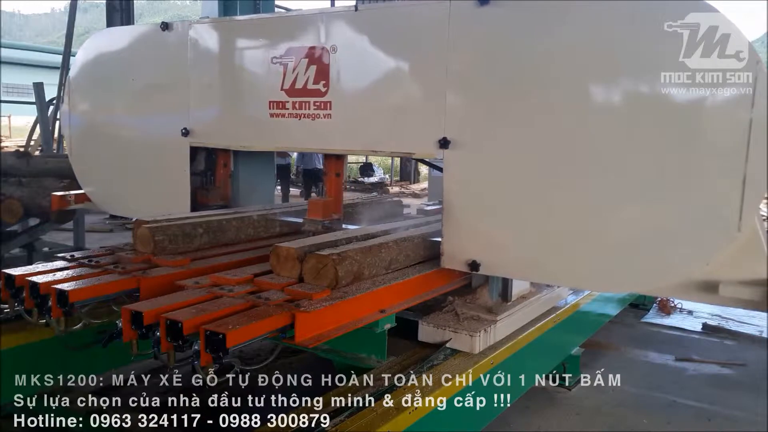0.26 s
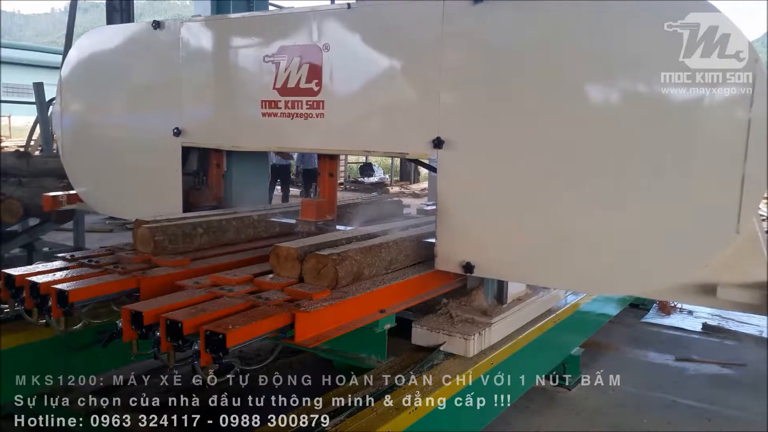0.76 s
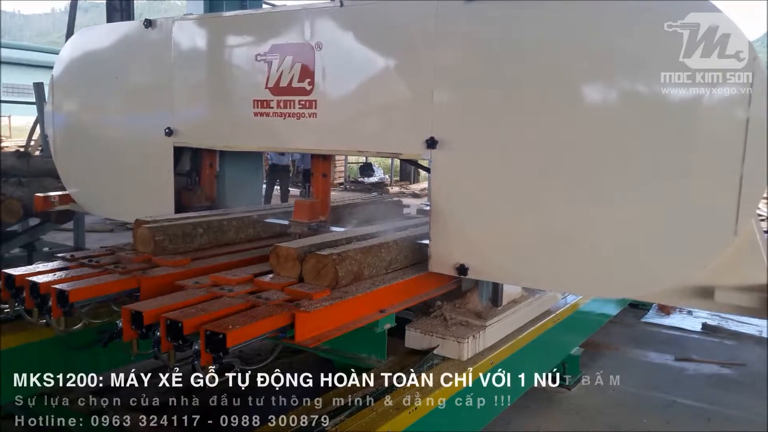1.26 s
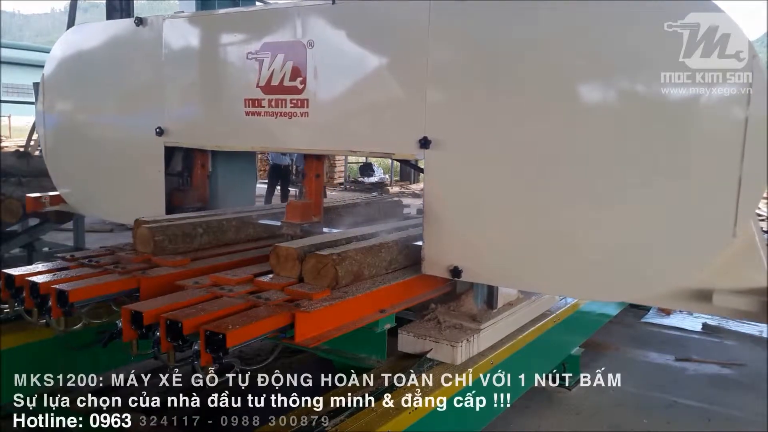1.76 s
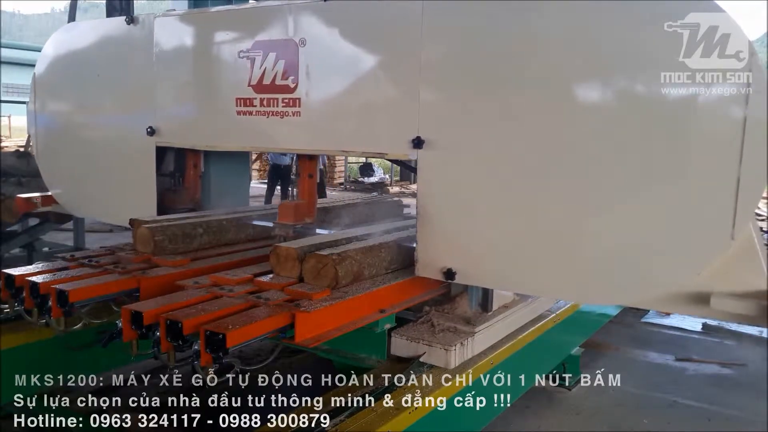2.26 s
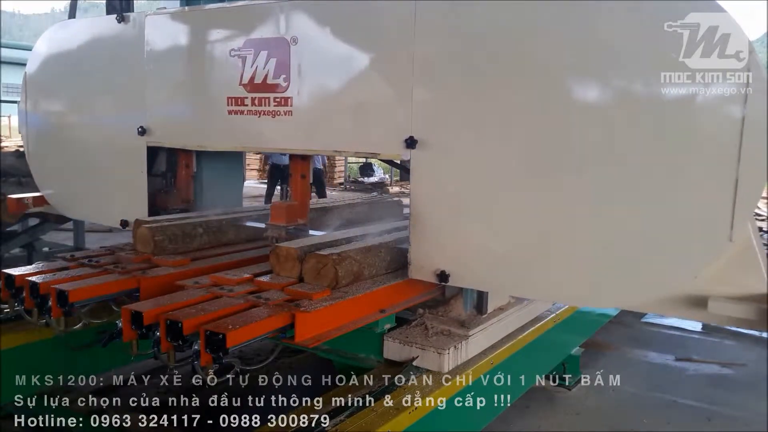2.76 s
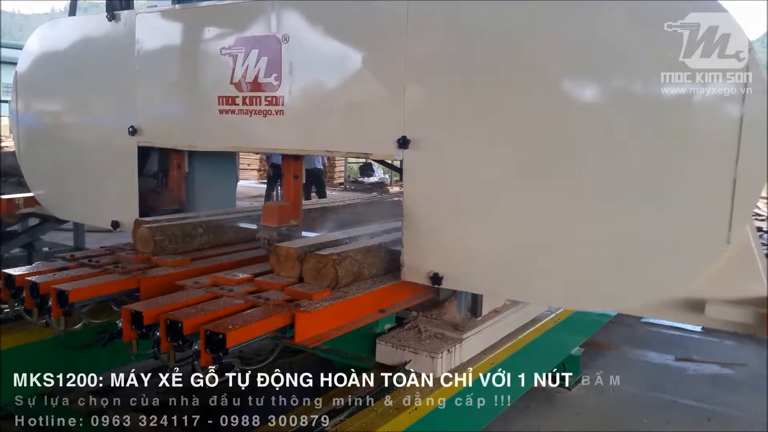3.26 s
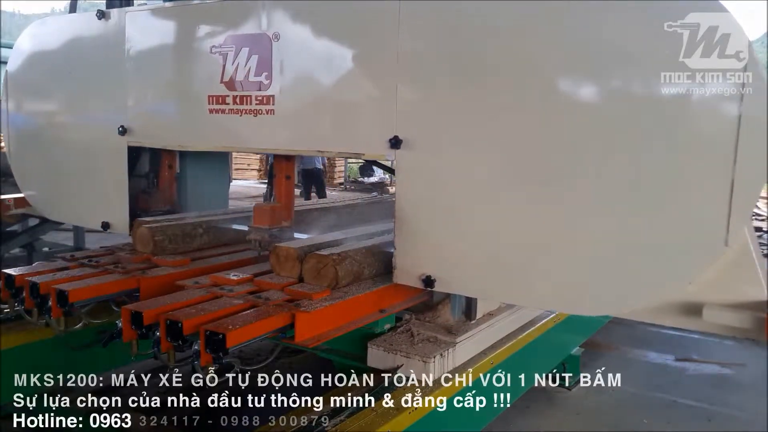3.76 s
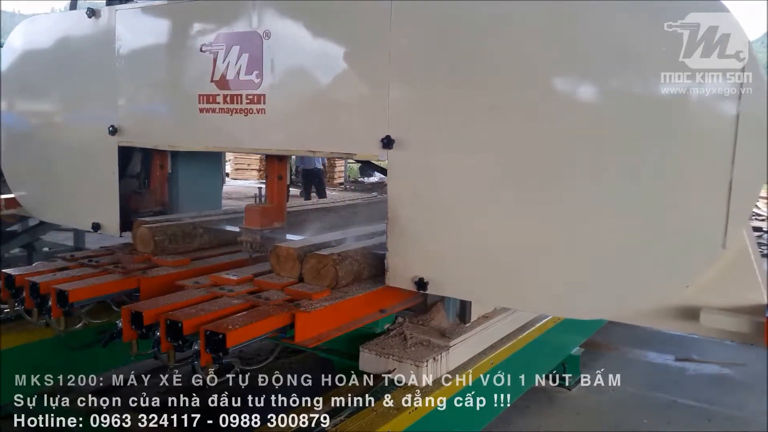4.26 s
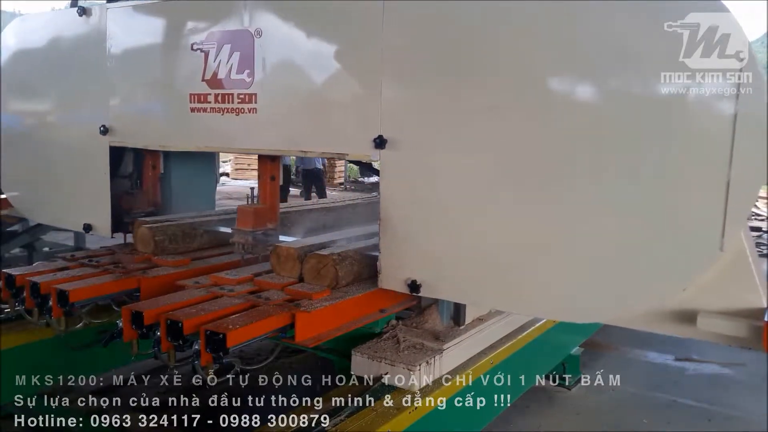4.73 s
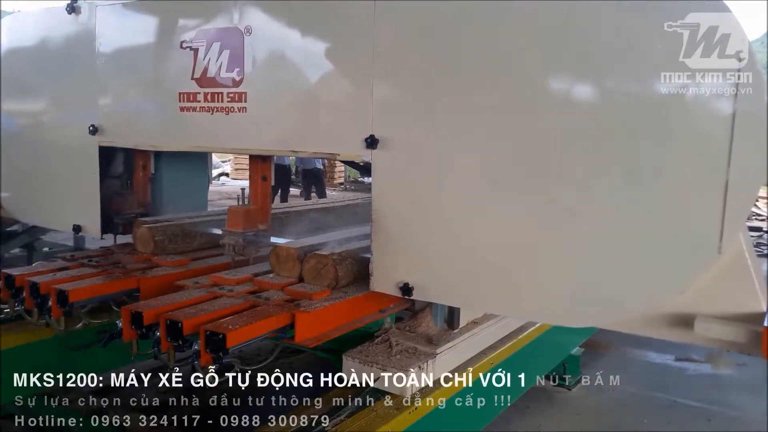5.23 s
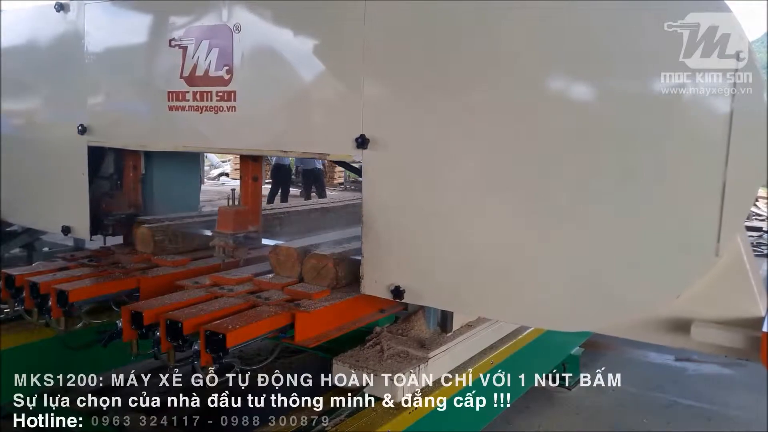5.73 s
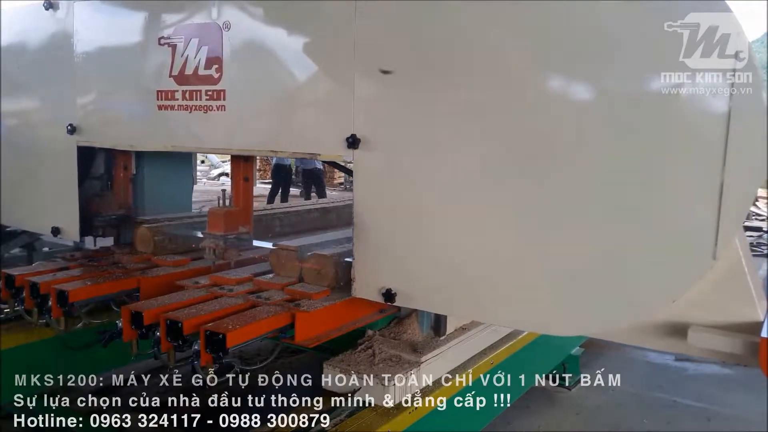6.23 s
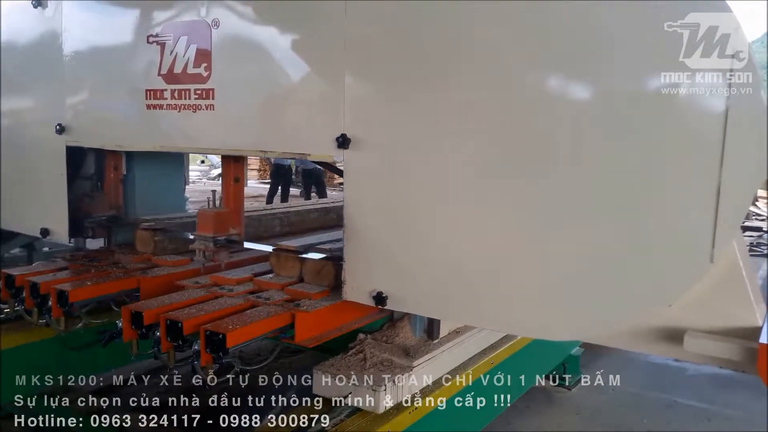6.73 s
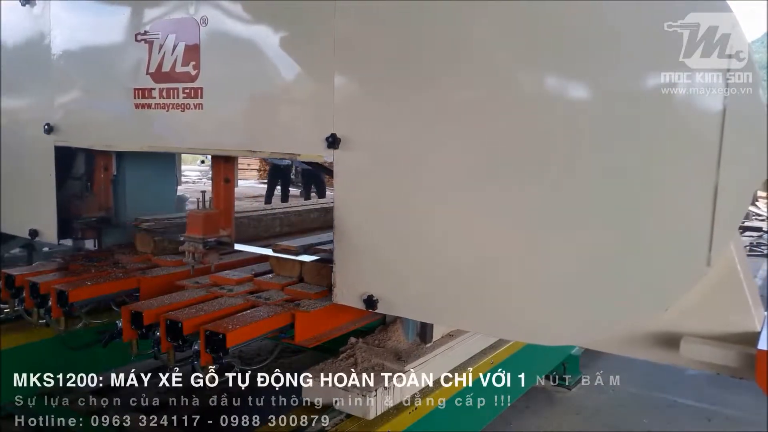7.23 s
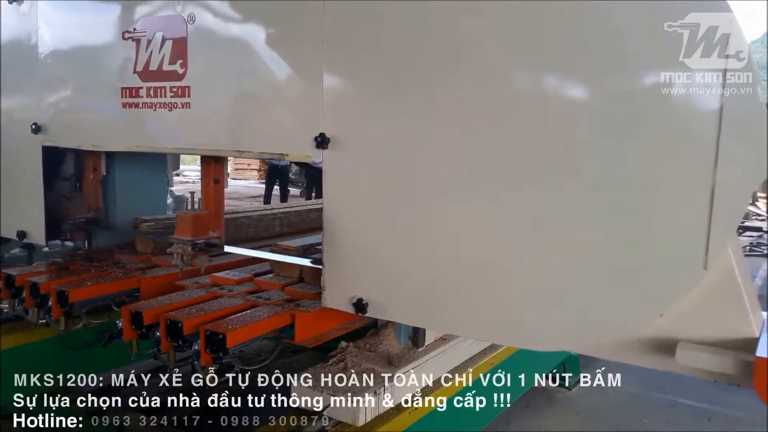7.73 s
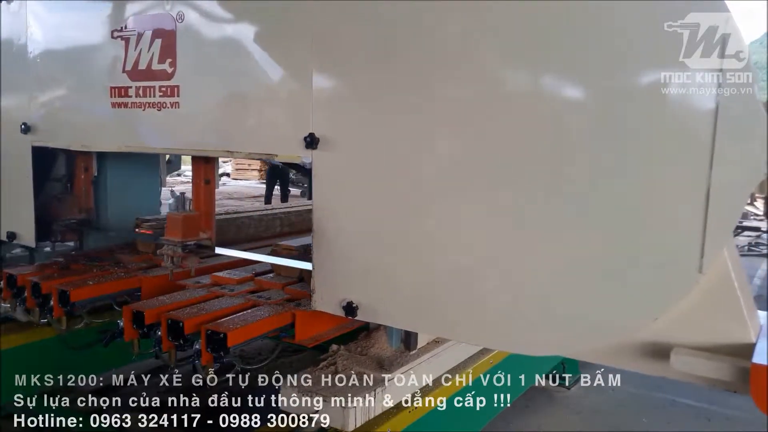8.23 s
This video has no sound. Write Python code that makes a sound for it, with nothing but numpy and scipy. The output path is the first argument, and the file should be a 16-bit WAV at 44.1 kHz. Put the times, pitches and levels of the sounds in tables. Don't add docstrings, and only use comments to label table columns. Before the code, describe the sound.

Continuous wood sawing, heard by two close small microphones: wide, diffuse hiss with little deep bass, a wavering metallic whine from the teeth and a constant machine roar. After most of the stretch the blade leaves the logs; the rasp fades, leaving roar and ringing steel, fuzzy fluttering whistles and a few dull metal rattles.

```python
import sys
import numpy as np
from scipy import signal
from scipy.fft import rfft, irfft
from scipy.io import wavfile
from scipy.ndimage import uniform_filter1d

SR = 44100
rng = np.random.default_rng(int(sys.argv[2]) if len(sys.argv) > 2 else 0)


def dump(signal):
    limited = np.clip(np.atleast_2d(signal).T, -1, 1)
    pcm = np.round(limited * 32767).astype(np.int16)
    wavfile.write(sys.argv[1], SR, pcm)


def convert_level_to_amplitude(level_db):
    exponent = np.asarray(level_db, float) / 20
    return 10 ** exponent


N = 374409
T = np.arange(N) / SR

# frequency in Hz, density in dB per Hz.
THRUM_SPECTRUM = [(20, -92), (50, -97), (80, -97), (110, -80), (140, -82), (200, -77.5), (250, -86),
                  (330, -100)]
# frequency in Hz, density in dB per Hz.
RUMBLE_SPECTRUM = [(180, -100), (260, -83.5), (330, -72), (400, -77.5), (500, -74.5), (600, -71.5),
                   (750, -70.5), (1000, -110)]
# frequency in Hz, density in dB per Hz.
ROAR_SPECTRUM = [(1200, -96.5), (1700, -77), (2100, -67), (2500, -68), (2900, -66.5), (3300, -68),
                 (3800, -71.5), (4500, -74.5), (5500, -77), (6500, -82), (8000, -87), (9500, -80),
                 (11000, -87.5), (15700, -89)]
# frequency in Hz, density in dB per Hz.
RING_SPECTRUM = [(450, -100), (600, -81.5), (700, -73.5), (780, -72), (850, -64.5), (1000, -64.5),
                 (1150, -66.5), (1350, -64), (1700, -67.5), (2100, -73.5), (2600, -90)]
# frequency in Hz, level in dB, loudest time in seconds, fall in dB a second.
MOTOR_TONES = [(333, -53, 6.12, 26), (335.6, -62, 7.9, 3), (419, -58, 1.1, 4), (455.3, -53, 8, 1.24),
               (599, -65, 6.5, 1), (645, -54.5, 1, 2), (649, -60, 4, 3), (746, -51, 3, 4.5),
               (915, -51.5, 7.3, 0.5), (986, -51.5, 4.4, 2), (1188, -55.5, 1.7, 2), (1357, -46, 6.46, 4),
               (1438, -49.5, 6, 4), (1492, -54, 2.3, 0.5)]
# frequency in Hz, width in Hz, level in dB,
# loudest time in seconds, fall in dB a second.
HOUSING_MODES = [(847, 9.8, -46, 8, 7), (862, 12, -49, 8.5, 4), (802, 14, -44, 8, 18),
                 (942, 10, -56.5, 7, 0.5), (1027, 4.5, -54.5, 3.5, 5.5), (1853, 31, -45.5, 7, 1.5),
                 (2018, 33, -55, 1, 2.5), (2362, 17, -50.5, 3.5, 2.5), (2500, 95, -42, 0.5, 3.5),
                 (2637, 46, -45.5, 7, 10), (2880, 99, -44.5, 4.5, 3.7), (4176, 30, -48.5, 2, 3.4),
                 (9180, 50, -49.5, 8.5, 1.5), (9970, 60, -48.5, 4.5, 4.5)]
# frequency in Hz, width in Hz, level in dB.
CLAMP_MODES = [(1360, 38, 0), (1850, 33, 0), (2140, 41, -4), (2670, 40, 1), (2800, 200, -1),
               (3780, 49, -12), (4670, 70, -9), (5080, 110, -9), (5000, 1400, -9), (5700, 70, -10)]
# start in seconds, level in dB, rattle length in seconds, extra dB of the shrill modes.
CLANKS = [
    (7.866, -35, .05, -6),
    (7.923, -28, 0.045, -9),
    (8.008, -28, .04, 3),
    (8.095, -38.5, 0.064, 10),
    (8.217, -44, .06, 0),
]
# centre in seconds, frequency in Hz, level in dB, spread in seconds.
WHISTLES = [
    (6.87, 866, -45, .04),
    (7.1, 856, -41.5, 0.035),
    (7.315, 862, -39, 0.042),
    (7.47, 866, -38.5, .03),
    (7.585, 850, -43, .025),
    (7.775, 860, -37.5, .04),
    (7.99, 858, -40.5, .035),
    (8.3, 843, -38.5, 0.065),
    (8.47, 850, -39.5, 0.036),
]
# frequency in Hz, density in dB per Hz.
RASP_SPECTRUM = [(1000, -98), (1700, -72.5), (1800, -78), (2100, -68), (2500, -66), (2900, -65),
                 (3050, -73), (3300, -66.5), (3800, -71), (4500, -74.5), (5500, -76), (6500, -82.5),
                 (8000, -83.5)]
# frequency in Hz, density in dB per Hz.
DUST_SPECTRUM = [(5000, -93.5), (6500, -78), (8000, -79.5), (9000, -74.5), (10000, -77), (11000, -77.5),
                 (13000, -78.5), (14200, -75.5), (15700, -80.5)]
# multiple of the tooth rate, level in dB.
WEAK_HARMONICS = [(4, -51), (6, -59), (7, -58), (8, -60), (9, -59), (10, -61), (11, -60), (12, -62),
                  (13, -63), (14, -63), (15, -66), (16, -65), (17, -64)]
# multiple of the tooth rate,
# centre in seconds, level in dB, spread in seconds.
SINGING_HARMONICS = [(1, 0.97, -52.5, 0.14), (1, 1.5, -50, .5), (1, 3.05, -42.5, 0.45), (1, 4.46, -53, .4),
                     (1, 5.93, -46.5, 0.59), (2, .5, -46.5, .3), (2, 2.12, -49, 0.45), (2, 3.6, -49, 0.13),
                     (2, 4.33, -49, 0.26), (2, 5.2, -51, 0.18), (2, 6.14, -47, 0.43), (3, .6, -52, 0.44),
                     (3, 2, -44.5, 0.39), (3, 3.4, -47.5, 0.4), (3, 4.57, -42, .35), (3, 5.27, -45.5, 0.15),
                     (3, 6.75, -51, .4), (5, .3, -51, .2), (5, 1.1, -47, 0.27), (5, 1.69, -44.5, 0.15),
                     (5, 2.2, -53, .1), (5, 2.75, -53, 0.17), (5, 4.74, -46, 0.12), (5, 4.34, -53, 0.17),
                     (5, 5.2, -50, .15)]
# frequency in Hz, left-right likeness from 0 to 1.
LIKENESS = [(60, .6), (300, 0.75), (700, .68), (1400, 0.47), (2500, 0.37), (5000, 0.23), (9600, 0.17),
            (11000, 0.41), (12400, 0.65), (14200, .38), (15800, .68)]
# time in seconds, lead in samples.
LEFT_LEAD = [(0, 3.6), (5.5, 5.5), (8.49, 5.7)]
# centre in seconds, depth in dB, spread in seconds.
BASS_DIPS = [
    (.412, 22, 0.008),
    (1.105, 30, 0.009),
    (1.572, 28, 0.007),
    (1.615, 28, 0.0062),
    (3.82, 7, 0.017),
    (4.583, 5, .012),
    (4.82, 9, 0.012),
    (5.775, 9, 0.01),
]

FREED_S = 6.61


def evened(x):
    return x / np.sqrt(np.mean(x ** 2) + 1e-20)


def read(points, hz):
    f, value = np.transpose(points)
    return np.interp(np.log(hz + 1), np.log(f + 1), value)


def ramp(s, length):
    return np.clip((T - s) / length, 0, 1)


def bump(s, spread):
    return np.exp(-.5 * ((T - s) / spread) ** 2)


def passing(db, s, fall_db):
    return db - fall_db * abs(T - s)


def in_wood():
    return -60 * np.clip(T - 6.75, 0, 1)


def drift(t, top_hz, low_hz=0.1995):
    rates = np.geomspace(low_hz, top_hz, num=16)
    return evened(sum(np.sin(2 * np.pi * (f * t + rng.random())) / np.sqrt(f) for f in rates))


def resonate(x, hz, width):
    turn = np.exp(2j * np.pi * hz * np.arange(len(x)) / SR)
    r = np.exp(-np.pi * width / SR)
    return 2 * (turn * signal.lfilter([1 - r], [1, -r], x / turn)).real


def hiss(spectrum, level_db, patchy_db, flicker_db, size=1024, patch=(.12, 500), comb_db=None):
    hop = size // 4
    hz = np.fft.rfftfreq(size, 1 / SR)[:, None]
    t = np.arange(N // hop + 5) * hop / SR
    a, b, c, d, patches = rng.standard_normal((len(t), len(hz), 5)).T
    for axis, span in enumerate((patch[1] * size / SR, patch[0] * SR / hop)):
        span = max(round(span), 1)
        patches = uniform_filter1d(uniform_filter1d(patches, span, axis), span, axis)
    same = np.clip(read(LIKENESS, hz), 0, 1)
    right = a + 1j * b
    lead_s = np.interp(t, *np.transpose(LEFT_LEAD)) / SR
    early = np.exp(2j * np.pi * hz * lead_s * (hz < 10200))
    left = same * early * right + np.sqrt(1 - same ** 2) * (c + 1j * d)
    shape_db = read(spectrum, hz)
    moving_db = patchy_db * evened(patches) + flicker_db * drift(t, 25)
    if comb_db:
        moving_db = moving_db + comb_db(hz)
    z = np.array([left, right]) * convert_level_to_amplitude(shape_db + moving_db)
    rms = np.sqrt(np.sum(convert_level_to_amplitude(2 * shape_db)) * SR / size)
    noise = signal.istft(z, nperseg=size, noverlap=size - hop)[1][:, :N]
    return convert_level_to_amplitude(level_db) * rms * evened(noise)


def tone(turns, db, waver_db, blur):
    t = T[::256]
    level, phase = drift(t, 40, 4), drift(t, 25, 1.5)
    sides = []
    for _ in "LR":
        side_db = waver_db * (level + .5 * drift(t, 20, 2))
        side_phase = blur * phase + .45 * drift(t, 6, .6)
        wave = np.sin(2 * np.pi * turns + np.interp(T, t, side_phase))
        sides.append(np.sqrt(2) * convert_level_to_amplitude(db + np.interp(T, t, side_db)) * wave)
    return np.array(sides)


def span_modes(hz):
    span_hz, stiffness = 39.2, 3.8e-5
    k = np.arange(80)
    mode = np.interp(hz, k * span_hz * np.sqrt(1 + stiffness * k ** 2), k)
    return 4.2 * np.cos(2 * np.pi * mode)


def machine():
    drive_s, rise_s, fall_s = 7.8, 0.21, 0.4
    drive_db = 3.5 * ramp(drive_s, rise_s) * np.exp(-np.maximum(T - drive_s - rise_s, 0) / fall_s)
    thrum_db = -3 + 3.5 * ramp(FREED_S, .4) + 1.8 * drift(T, 12, 2.5)
    rumble_db = -3 + .5 * drift(T, 3) + ramp(5.7, 0.52)
    roar_db = .5 * drift(T, 3) + drive_db
    ring_db = -1.5 + .4 * drift(T, 3) + .5 * drive_db + 2.5 * bump(FREED_S, .3)
    thrum = hiss(THRUM_SPECTRUM, thrum_db, patchy_db=2.0, flicker_db=1.9, size=4096, patch=(.1, 40))
    rumble = hiss(RUMBLE_SPECTRUM, rumble_db, patchy_db=1.85, flicker_db=0.75, size=2048, patch=(.2, 45))
    roar = hiss(ROAR_SPECTRUM, roar_db, patchy_db=2.0, flicker_db=0.72, size=2048, patch=(.3, 50))
    ring = hiss(RING_SPECTRUM, ring_db, patchy_db=3.0, flicker_db=0.4, size=4096, patch=(.45, 22),
                comb_db=span_modes)
    return thrum + rumble + roar + ring


def hum():
    return sum(tone(hz * T, passing(*place), waver_db=2.5, blur=.25 + hz / 2000)
               for hz, *place in MOTOR_TONES)


def housing():
    out = np.zeros((2, N))
    for hz, width, *place in HOUSING_MODES:
        noises = rng.standard_normal((2, N))
        a, b = (evened(resonate(resonate(v, hz, width), hz, width)) for v in noises)
        level_db = passing(*place) + in_wood() * (hz > 4000)
        out += convert_level_to_amplitude(level_db) * np.array([a, .6 * a + .8 * b])
    return out


def clamp():
    a, b = rng.standard_normal((2, N))
    out = np.zeros((2, N))
    for hz, width, mode_db in CLAMP_MODES:
        swell = 0
        for s, db, length, shrill_db in CLANKS:
            decay = np.exp(-np.maximum(T - s, 0) / length)
            swell = swell + convert_level_to_amplitude(db + shrill_db * (hz > 4000)) * ramp(s, .012) * decay
        sides = np.array([evened(resonate(v, hz, width)) for v in (a, .4 * a + .9 * b)])
        out += convert_level_to_amplitude(mode_db - 7.5) * swell * sides
    return out


def whistles():
    return sum(tone(hz * T, db, waver_db=1.5, blur=0.69) * bump(s, spread)
               for s, hz, db, spread in WHISTLES)


def chips():
    loop_hz = 3.9
    settle_db = -3.5 * np.exp(-T / 0.37)
    throb_db = 0.42 * np.sin(2 * np.pi * loop_hz * T + drift(T, 1.54))
    bite_db = settle_db + throb_db + .6 * drift(T, 16, 4)
    taper_db = -24 * np.maximum(T - 6.9, 0)
    dust_stop_db = -17 * ramp(6.635, 0.046)
    rasp = hiss(RASP_SPECTRUM, -0.5 + bite_db + taper_db, patchy_db=2.1, flicker_db=0.4, size=2048,
                patch=(.5, 30))
    fizz = hiss(DUST_SPECTRUM, .5 + bite_db + .1 * taper_db + dust_stop_db, patchy_db=0.7,
                flicker_db=0.25, size=512, patch=(.05, 600))
    return rasp + fizz


def teeth():
    tooth_hz = 835.55 - sum(.8 * bump(knot_s, .2) for knot_s in (1.7, 4.7))
    turns = np.cumsum(tooth_hz) / SR
    strong = 0
    for k in (1, 2, 3, 5):
        swell = sum(convert_level_to_amplitude(db) * bump(s, spread) for j, s, db, spread in SINGING_HARMONICS if round(j) == k)
        strong = strong + tone(k * turns, 0, waver_db=2, blur=.3 + .1 * k) * swell
    weak = sum(tone(k * turns, db, waver_db=2.5, blur=.4 + .22 * k) for k, db in WEAK_HARMONICS)
    return (strong + weak) * convert_level_to_amplitude(in_wood())


def scene():
    return machine() + hum() + housing() + clamp() + whistles() + chips() + teeth()


def roll_off(x):
    return signal.sosfilt(signal.butter(12, 17020, fs=SR, output="sos"), x)


def record(dry):
    hz = np.fft.rfftfreq(N, 1 / SR)
    gain = (hz < 15760) / np.sqrt(1 + (95 / (hz + 1)) ** 5)
    heard = irfft(rfft(dry) * gain, N)
    bass = irfft(rfft(heard) / (1 + (hz / 620) ** 10), N)
    dip_db = sum(-db * bump(s, spread) for s, db, spread in BASS_DIPS)
    mix = heard + bass * (convert_level_to_amplitude(dip_db) - 1)
    return roll_off(mix)


dry = scene()
out = record(dry)
dump(out)
```